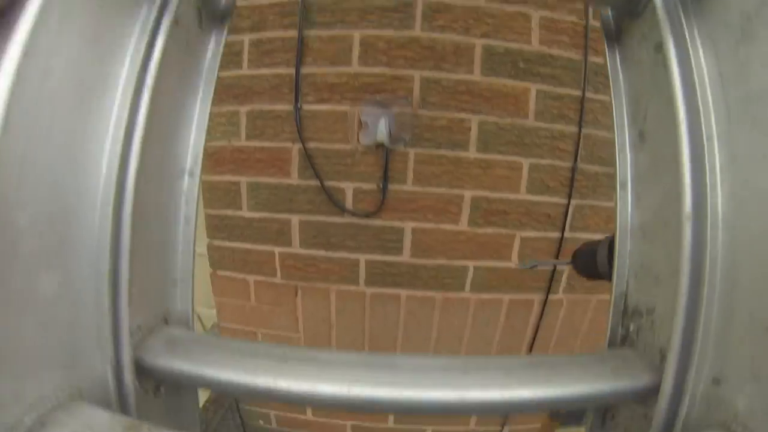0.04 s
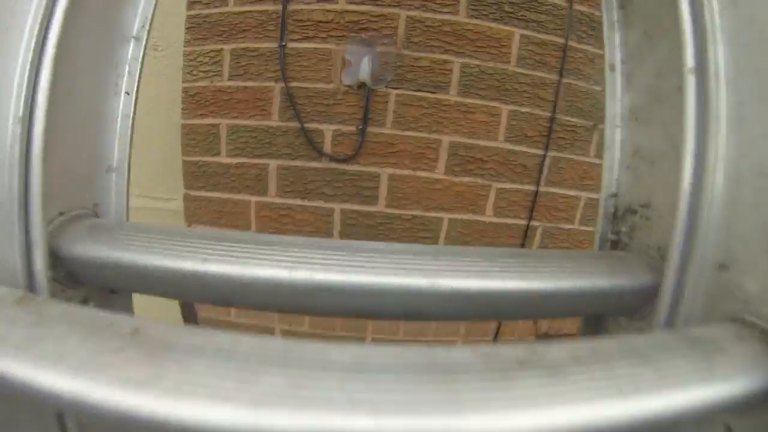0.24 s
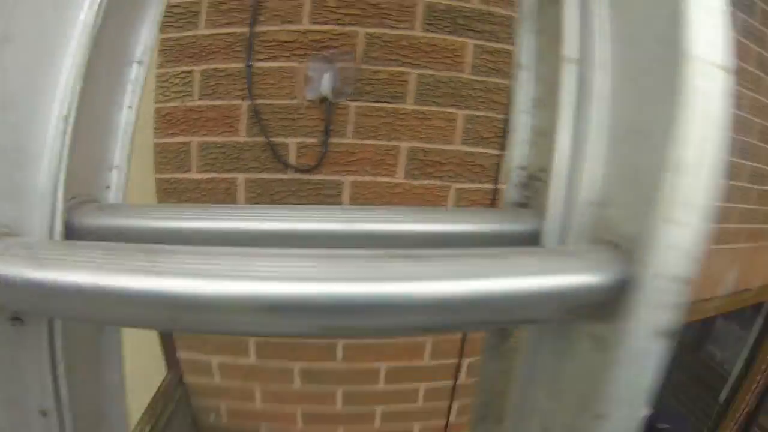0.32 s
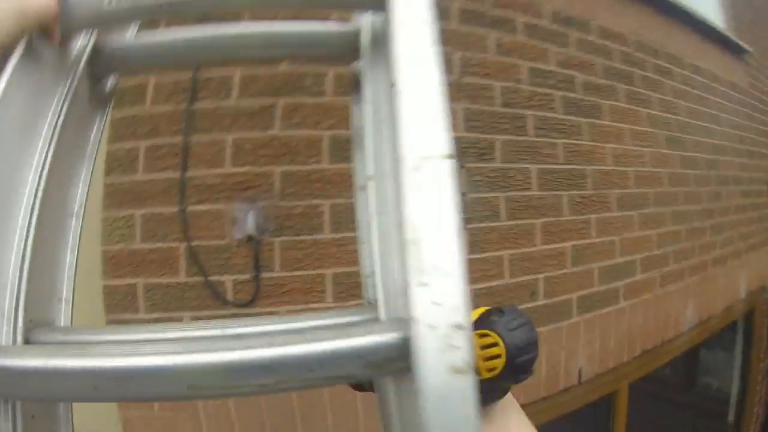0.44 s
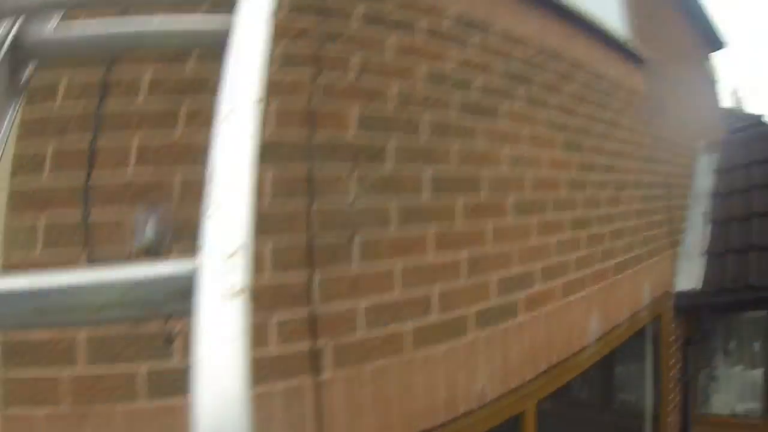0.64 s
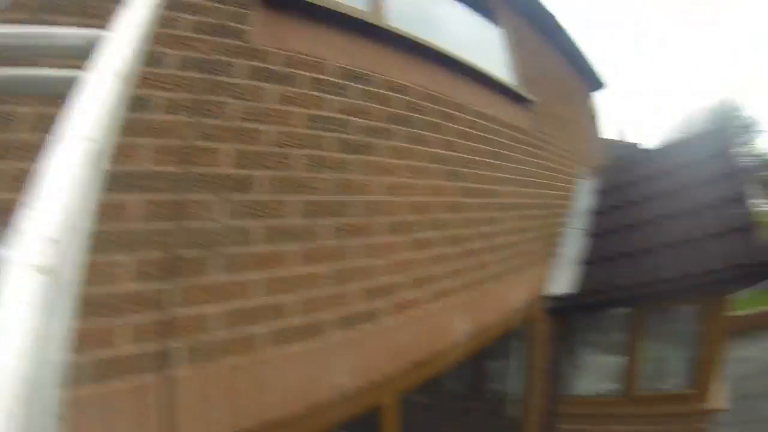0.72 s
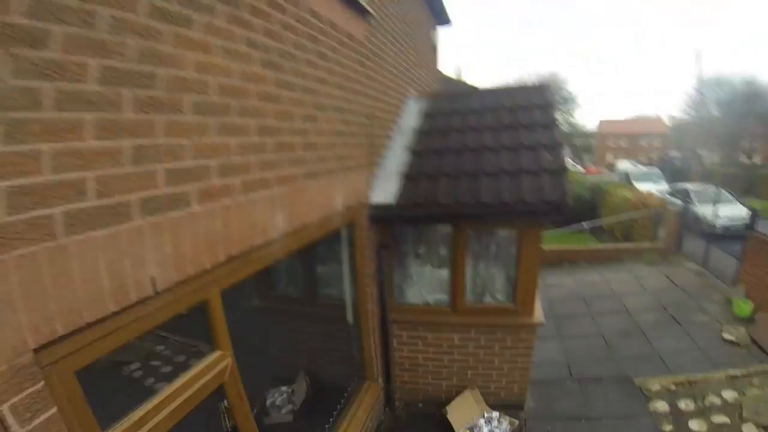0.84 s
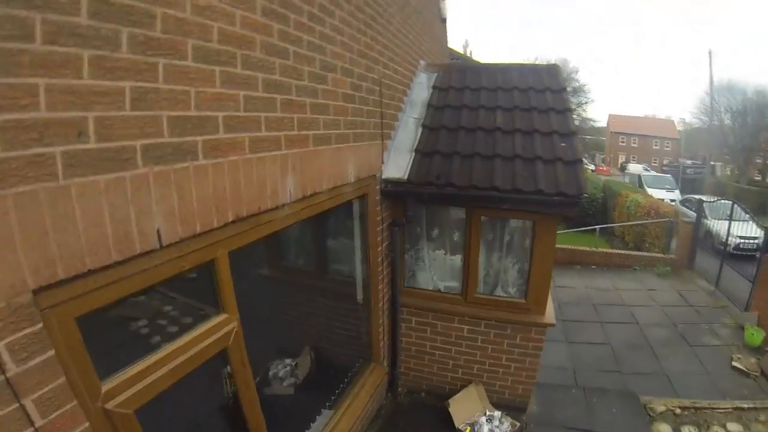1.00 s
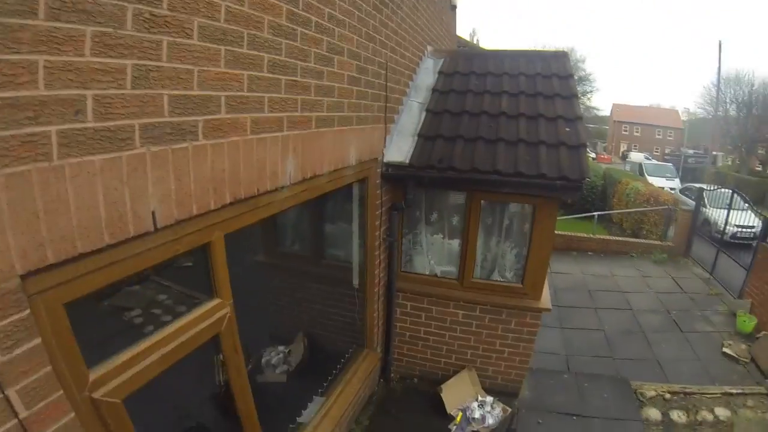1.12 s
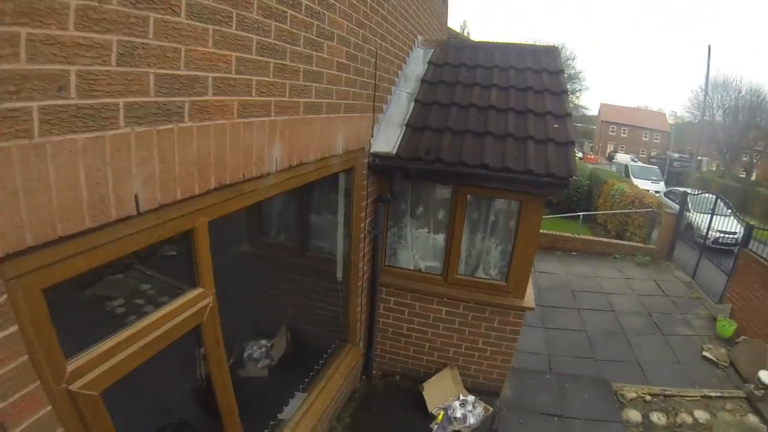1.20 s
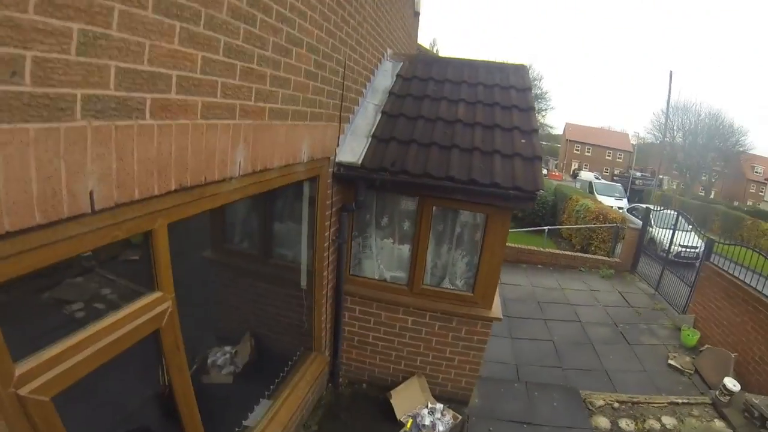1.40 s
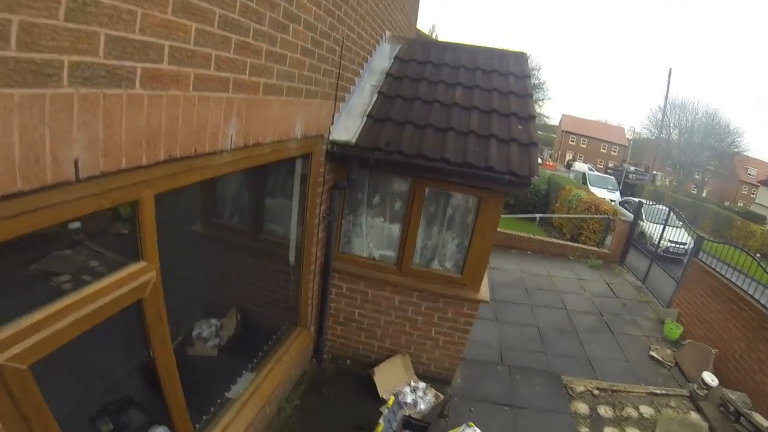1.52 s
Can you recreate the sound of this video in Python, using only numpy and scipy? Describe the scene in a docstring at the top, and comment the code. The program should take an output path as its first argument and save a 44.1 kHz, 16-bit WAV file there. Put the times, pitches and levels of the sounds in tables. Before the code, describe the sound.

Close metallic clatter on a ladder, followed by a short hissing slide and light clacks.

```python
"""Clothing rustles faintly on a swaying body-worn microphone, in quiet outdoor air.
A hand tool knocks and chatters against an aluminium ladder close by, ringing its modes; the hardest
knock overloads the microphone, which thumps when jolted. Something slides along the rail with a
friction hiss and ends in a few clacks and a tick. Fabric swishes as the wearer turns."""
import sys
import numpy as np
from scipy import signal
from scipy.fft import rfft, irfft
from scipy.io import wavfile

SR = 44100
rng = np.random.default_rng(int(sys.argv[2]) if len(sys.argv) > 2 else 0)


def store_pcm(level_fs):
    """Save levels as 16-bit WAV."""
    pcm = np.round(np.clip(level_fs, -1, 1) * 32767).astype(np.int16)
    wavfile.write(sys.argv[1], SR, np.atleast_2d(pcm).T)


N = 68355
CONTACT_RISE_S = 0.00077


def amp(db):
    """Decibels to gain."""
    return 10 ** (np.asarray(db) / 20)


def unit_rms(x):
    """Scales to an rms of one."""
    return x / np.sqrt(np.mean(x ** 2) + 1e-20)


def at_hz(table, hz):
    """Interpolates a table on a log-frequency axis."""
    table_hz, value = np.transpose(table)
    return np.interp(np.log(hz + 1), np.log(table_hz + 1), value)


def envelope(table, column=1):
    """A dB curve over time as a gain per sample."""
    rows = np.array(table)
    return amp(np.interp(np.arange(N) / SR, rows[:, 0], rows[:, column]))


def attack(t, rise_s):
    """Exponential rise from zero to one."""
    return 1 - np.exp(-t / rise_s)


def colour(x, spectrum):
    """Filters x by a dB spectrum; unit rms out."""
    gain = amp(at_hz(spectrum, np.fft.rfftfreq(len(x), 1 / SR)))
    return unit_rms(irfft(rfft(x) * gain, len(x)))


def add(mix, start_s, sound):
    """Mixes a sound in at start_s."""
    part = mix[max(round(start_s * SR), 0):][:len(sound)]
    part += sound[:len(part)]


def slips(per_s, spread_db):
    """Friction: tiny random impulses of uneven size."""
    impulses = rng.standard_normal(N) * (rng.random(N) < per_s / SR)
    return impulses * amp(spread_db * np.minimum(rng.exponential(1, N), 4))


def ring(t, modes, tilt_db_oct=0, partials=4, split=0.007, scatter_db=-0.5):
    """Decaying modes, each split into close beating partials that vary with the point of contact."""
    hz, db, t60_s = np.transpose(modes)[:, :, None]
    size, detune, phase = rng.standard_normal((3, partials, len(modes), 1))
    waves = amp(scatter_db * size) * np.sin(2 * np.pi * (hz * (1 + split * detune) * t + phase))
    gain = amp(db + tilt_db_oct * np.log2(hz / hz.mean()))
    decay = np.exp(-np.log(1000) * t / t60_s)
    return (gain * decay * waves.sum(0)).sum(0) / np.sqrt(partials)


def resonate(x, hz, width_hz):
    """A resonance that follows the curve hz."""
    carrier = np.exp(2j * np.pi * np.cumsum(hz) / SR)
    pole = np.exp(-np.pi * width_hz / SR)
    return 2 * (carrier * signal.lfilter([1 - pole], [1, -pole], x / carrier)).real


# rustle envelope: t/s, level/dB
RUSTLE_LEVEL = [(0, -69), (.03, -45.5), (.06, -61.5), (.19, -52), (.235, -43), (1.1, -42), (1.19, -46.5),
                (1.3, -50), (1.36, -38.5), (1.39, -41.5), (1.43, -33.5), (1.47, -40), (1.52, -32),
                (1.55, -37)]
# cloth spectrum: f/Hz, level/dB
CLOTH_SPECTRUM = [(150, -7), (280, 0), (400, -10), (620, -8), (950, 5), (1250, 2.5), (1600, 0.5),
                  (2100, -8), (2500, 7), (2850, -12.5), (3700, -17), (5600, -19.5), (8500, -33.5),
                  (9900, -30), (11000, -50)]
def rustle():
    """Cloth fibres brush past the microphone housing."""
    return envelope(RUSTLE_LEVEL) * colour(slips(per_s=11000, spread_db=-0.6), CLOTH_SPECTRUM)


# microphone movement: t/s, sway level/dB, rubbing level/dB
HANDLING_LEVELS = [(0, -30, -55), (.18, -30.5, -47.5), (.26, -11, -38), (.36, -23, -30), (.47, -10, -34.5),
                   (.6, -13.5, -37.5), (.68, -16, -22.5), (.78, -24.5, -40.5), (.88, -25, -40),
                   (.97, -33, -38), (1.05, -23, -42), (1.14, -20, -42.5), (1.25, -25.5, -39),
                   (1.37, -33, -35), (1.45, -20, -37), (1.55, -24, -34)]
# rubbing spectrum: f/Hz, level/dB
RUBBING_SPECTRUM = [(20, -20), (45, 14), (70, 2), (110, -5), (160, 0), (260, -13.5), (450, -21),
                    (1500, -48)]
def handling(sway_hz=21.51, wander_depth=0.203, wander_hz=22.7):
    """The microphone sways on its mount at a wandering rate and rubs with a low rumble."""
    lowpass = np.exp(-(np.fft.rfftfreq(N, 1 / SR) / wander_hz) ** 2)
    wander = unit_rms(irfft(rfft(rng.standard_normal(N)) * lowpass, N))
    hz = sway_hz * np.exp(wander_depth * wander)
    sway = unit_rms(np.sin(2 * np.pi * np.cumsum(hz) / SR))
    rubbing = colour(rng.standard_normal(N), RUBBING_SPECTRUM)
    return envelope(HANDLING_LEVELS) * sway + envelope(HANDLING_LEVELS, column=2) * rubbing


# background spectrum: f/Hz, level/dB
AIR_SPECTRUM = [(30, 16), (150, 4), (400, 0.5), (1000, 1.5), (2500, -2.5), (4500, -8.5), (8000, -18),
                (12000, -21.5), (15000, -38)]
def outdoor_air(level_db=-51.5):
    """Steady, bass-heavy background noise."""
    return amp(level_db) * colour(rng.standard_normal(N), AIR_SPECTRUM)


# dense weak modes of ladder and tool: f/Hz, level/dB
CLATTER_SPECTRUM = [(100, -13.5), (300, -20), (420, -21), (580, -0.5), (720, -10.5), (950, 6.5), (1090, 0),
                    (1230, 1.5), (1480, -6), (1800, 1.5), (2150, -14), (2480, 7), (2780, -9.5),
                    (3200, -0.5), (3550, -10), (4200, -10.5), (6000, -20.5), (8500, -26.5), (10000, -27.5),
                    (11000, -38), (15000, -44)]
# their decay: f/Hz, t60/s
CLATTER_DECAY = [(200, 0.11), (1000, 0.32), (2500, 0.13), (5000, 0.16), (9000, 0.11), (15000, 0.1)]
def clatter(t, tilt_db_oct, crack_db=2.5, crack_s=0.0054):
    """Densely packed modes start with a crack at contact; the midrange rings longest."""
    spectrum = [(hz, db + tilt_db_oct * np.log2(hz)) for hz, db in CLATTER_SPECTRUM]
    noise = colour(rng.standard_normal(len(t)), spectrum)
    hz, age_s, bins = signal.stft(noise, SR, nperseg=256)
    decay = np.exp(-np.log(1000) * age_s / at_hz(CLATTER_DECAY, hz)[:, None])
    tail = signal.istft(bins * decay, SR, nperseg=256)[1][:len(t)]
    return tail * (1 + amp(crack_db) * np.exp(-t / crack_s)) / 2


# tool contacts: t/s, ring level/dB, clatter level/dB, clatter tilt/(dB/oct)
TOOL_KNOCKS = [(0.23, -30.5, -51, -18), (0.2414, -17.5, -16, 8), (0.2449, -24, -12, -3),
               (.253, -25.5, -12.5, -2.5), (.264, -24, -37, 0), (0.29, -25, -20.5, -3.5),
               (.351, -7, -9, -1), (.356, -11.5, -10.5, 3), (0.3622, -11, -5.5, -2), (.369, -12, -4, 1.4),
               (.383, -22, -9.5, 0.2), (.410, -21, -13.5, -1), (.479, -26.5, -26, 2.5),
               (.496, -48, -19.5, 1), (0.5, -21, -17.5, -0.5), (0.519, -26, -14.5, -0.5),
               (.526, -24.5, -13.5, 0), (.533, -23.5, -16, 0), (0.5408, -20.5, -14.5, -1),
               (.575, -23.5, -31, 6), (.715, -23, -17, -6.5), (1.005, -30, -25, -6.5),
               (1.037, -31, -26.5, -6.5), (1.058, -33.5, -33.5, -9), (1.083, -35.5, -40, -4)]
# strong ladder modes: f/Hz, level/dB, t60/s
LADDER_MODES = [(490, -15, 0.17), (568.4, -16.5, 0.53), (600, -17.5, 0.57), (776, -17, 0.31),
                (920, -5, 0.24), (968, -2, 0.33), (1202.6, -3.5, 0.34), (1220.3, 0, 0.23),
                (1258, -11.5, 0.32), (1752, -10, 0.25), (1811, -11.5, 0.37), (1917, -23, 0.66),
                (2154, -25, 0.51), (2402, -15.5, 0.28), (2472, -7, 0.24), (3043, -11.5, 0.19),
                (3234, -16.5, 0.13), (4080, -14.5, 0.086)]
def knocks(ring_rise_s=0.00049):
    """Each contact of the tool sets the ladder ringing and clattering."""
    out, t = np.zeros(N), np.arange(SR // 2) / SR
    for start_s, ring_db, clatter_db, tilt_db_oct in TOOL_KNOCKS:
        add(out, start_s, amp(ring_db) * ring(t, LADDER_MODES) * attack(t, ring_rise_s))
        add(out, start_s, amp(clatter_db) * clatter(t, tilt_db_oct) * attack(t, CONTACT_RISE_S))
    return out


# microphone jolts: t/s, swing level/dB, thud level/dB
JOLTS = [(0.245, -5.5, -38), (0.441, -14, -17), (0.668, -13, -25), (0.702, 0, -17)]
# housing thud spectrum: f/Hz, level/dB
THUD_SPECTRUM = [(30, 9), (130, 2), (300, -14), (550, -12), (1500, -8), (6000, -47)]
def thumps(start_hz=62.5, end_hz=19.8, sag_s=0.013, swing_decay_s=0.073, thud_decay_s=0.0097):
    """A jolt swings the microphone at a falling pitch and draws a dull thud from its housing."""
    out, t = np.zeros(N), np.arange(SR) / SR
    hz = end_hz + (start_hz - end_hz) * np.exp(-t / sag_s)
    swing_shape = attack(t, rise_s=0.0096) * np.exp(-t / swing_decay_s)
    swing = np.sin(2 * np.pi * np.cumsum(hz) / SR) * swing_shape
    thud_shape = attack(t, CONTACT_RISE_S) * np.exp(-t / thud_decay_s)
    for start_s, swing_db, thud_db in JOLTS:
        thud = colour(rng.standard_normal(SR), THUD_SPECTRUM) * thud_shape
        add(out, start_s, amp(swing_db) * swing + amp(thud_db) * thud)
    return out


# pressure on the rail: t/s, level/dB
SLIDE_PRESSURE = [(.46, -110), (.53, -23.5), (.62, -32.5), (.69, -36), (.73, -34), (.80, -34.5),
                  (.88, -34.5), (.98, -37), (1.01, -29.5), (1.06, -31), (1.09, -59), (1.14, -83)]
# ladder body spectrum: f/Hz, level/dB
BODY_SPECTRUM = [(200, -14.5), (430, -11.5), (580, -1.5), (720, -30), (950, 4), (1250, 0), (1500, 1),
                 (1800, 1), (2150, -4.5), (2480, 5), (2900, -6), (3300, -7), (4000, -28), (15000, -34)]
# hiss envelope: t/s, level/dB
HISS_LEVEL = [(.47, -81), (.50, -52), (.60, -42.5), (.69, -42), (.74, -36.5), (.84, -40), (.93, -36.5),
              (1.02, -36), (1.065, -41), (1.09, -59), (1.13, -71)]
# hiss resonances: f/Hz, half-width per stage/Hz, level/dB
HISS_RESONANCES = [(4000, 330, 6), (4730, 530, 5.5), (6860, 510, 4), (9970, 360, -5.5), (12400, 770, -13)]
def slide(slips_per_s=26000, spread_db=0.6, bed_db=-24, glide_per_s=0.19, in_tune_at_s=0.99):
    """Friction along the rail drives the ladder's body and slowly rising, hissing resonances."""
    glide = np.exp(glide_per_s * (np.arange(N) / SR - in_tune_at_s))
    friction = slips(slips_per_s, spread_db)
    hiss = amp(bed_db) * friction
    for hz, half_width_hz, db in HISS_RESONANCES:
        band = resonate(slips(slips_per_s, spread_db), hz * glide, 2 * half_width_hz)
        hiss += amp(db) * resonate(band, hz * glide, 2 * half_width_hz)
    body = colour(friction, BODY_SPECTRUM)
    return envelope(SLIDE_PRESSURE) * body + envelope(HISS_LEVEL) * unit_rms(hiss)


# clacks: t/s, ring level/dB, crack level/dB, tilt/(dB/oct)
END_CLACKS = [(1.004, -22, -38, -2), (1.0252, -13.5, -29, -1), (1.0365, -14, -23, 1.5),
              (1.0445, -23, -26.5, 9), (1.0585, -19.5, -32, -1.5), (1.0995, -35, -29.5, 6)]
# modes of the clacking parts: f/Hz, level/dB, t60/s
PART_MODES = [(577, -13, 0.29), (609, -18.5, 0.32), (1300, -8, 0.018), (1460, 5, 0.013),
              (1800, -0.5, 0.018), (2300, 0.5, 0.015), (3836, -6.5, 0.032), (4220, -5, 0.018)]
def clacks(rise_s=0.00066, crack_decay_s=0.011):
    """Small hard parts tap together and ring briefly as the slide runs out."""
    out, t = np.zeros(N), np.arange(SR // 2) / SR
    for start_s, ring_db, crack_db, tilt_db_oct in END_CLACKS:
        crack = amp(crack_db) * clatter(t, tilt_db_oct) * np.exp(-t / crack_decay_s)
        ringing = amp(ring_db) * ring(t, PART_MODES, tilt_db_oct)
        add(out, start_s, (ringing + crack) * attack(t, rise_s))
    return out


# tick modes: f/Hz, level/dB, t60/s
TICK_RING = [(2520, -11, 0.022), (4100, 8.5, 0.017), (4620, -2, 0.013)]
def tick(start_s=1.102, gain_db=-26.5):
    """A last light contact, thinner and higher than the clacks."""
    out, t = np.zeros(N), np.arange(SR // 2) / SR
    add(out, start_s, amp(gain_db) * ring(t, TICK_RING) * attack(t, CONTACT_RISE_S))
    return out


# swish envelope: t/s, level/dB
SWISH_LEVEL = [(1.1, -78), (1.16, -55.5), (1.24, -47), (1.34, -43.5), (1.44, -45.5), (1.5, -67),
               (1.55, -79)]
# swish spectrum: f/Hz, level/dB
SWISH_SPECTRUM = [(1000, -14), (2800, -0.5), (3200, 0), (3850, -3), (4500, -21), (5500, -12), (7000, -24),
                  (15000, -52)]
def swish():
    """Fabric swishes as the wearer turns, higher and softer than the rustle."""
    return envelope(SWISH_LEVEL) * colour(rng.standard_normal(N), SWISH_SPECTRUM)


def scene():
    """All sources summed to mono."""
    air = outdoor_air()
    ladder = knocks() + clacks() + tick() + slide()
    wearer = rustle() + swish() + handling() + thumps()
    return (air + ladder + wearer)[None]


def record(dry, knee=30, cutoff_hz=15400):
    """Overload at full scale, then a low-pass."""
    clipped = dry / (1 + abs(dry) ** knee) ** (1 / knee)
    lowpass = signal.firwin(255, cutoff_hz, window=("kaiser", 8), fs=SR)
    return signal.oaconvolve(clipped, lowpass[None], "same")


dry = scene()
out = record(dry)
store_pcm(out)
```